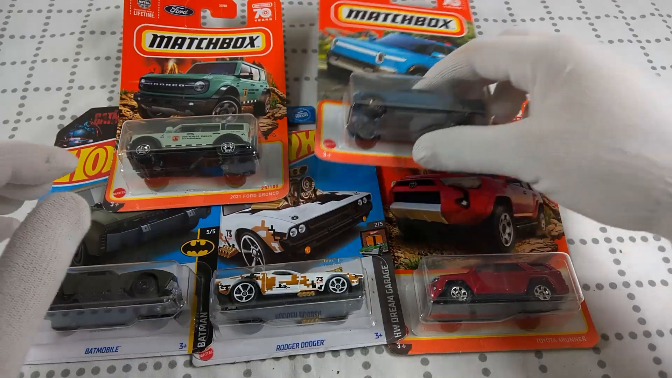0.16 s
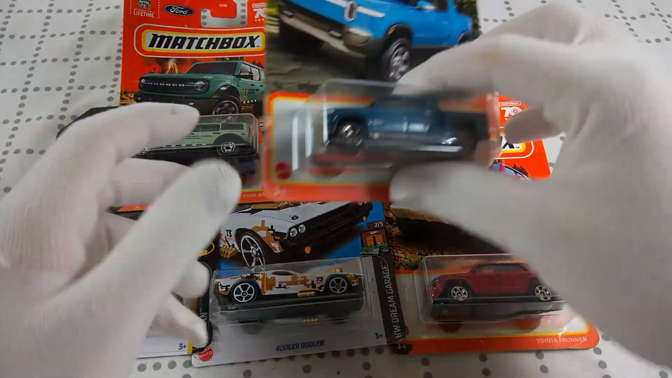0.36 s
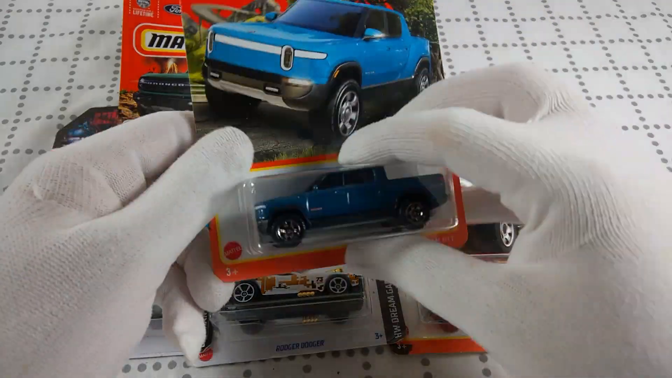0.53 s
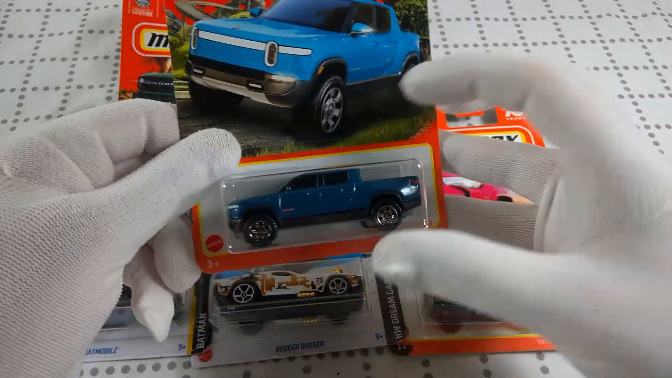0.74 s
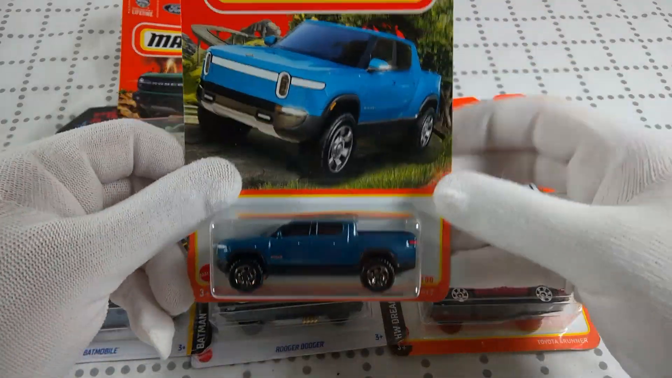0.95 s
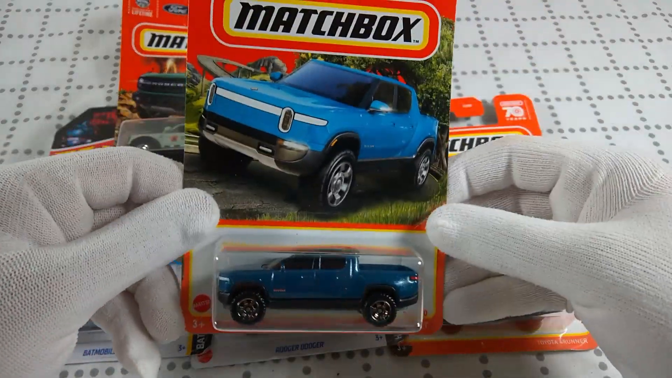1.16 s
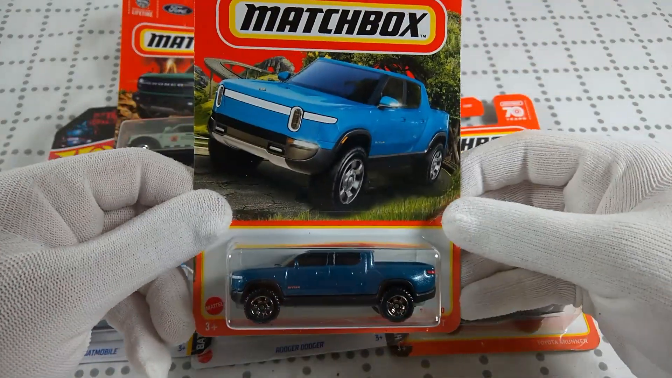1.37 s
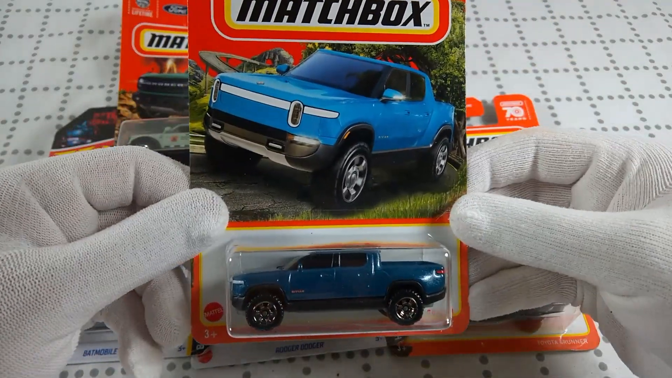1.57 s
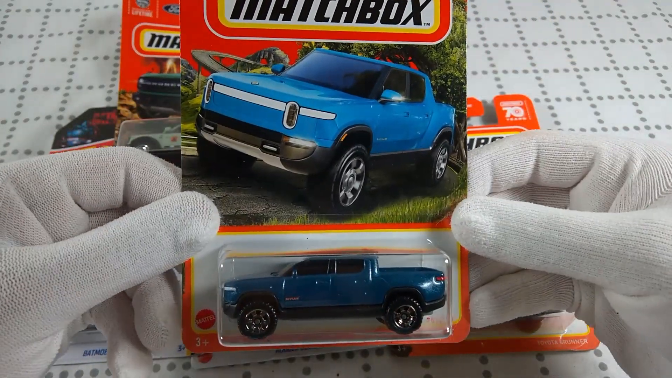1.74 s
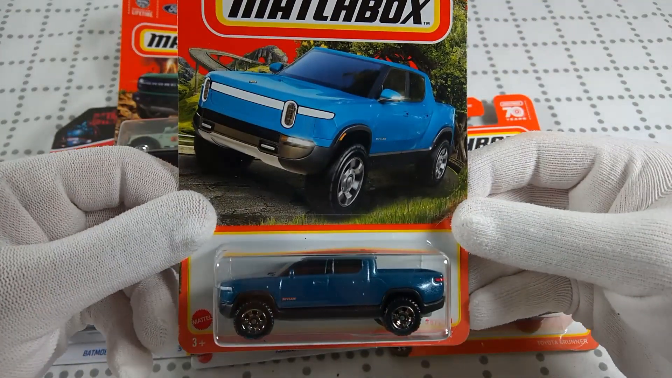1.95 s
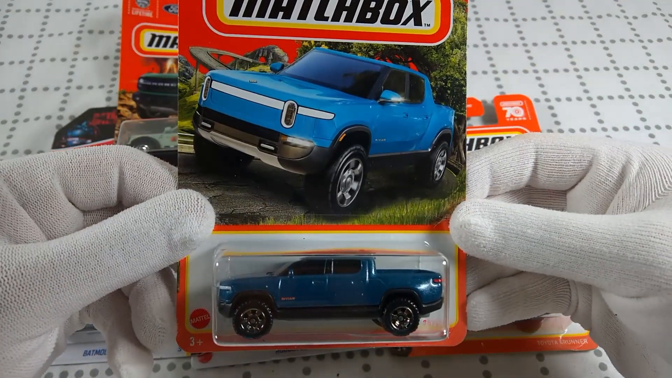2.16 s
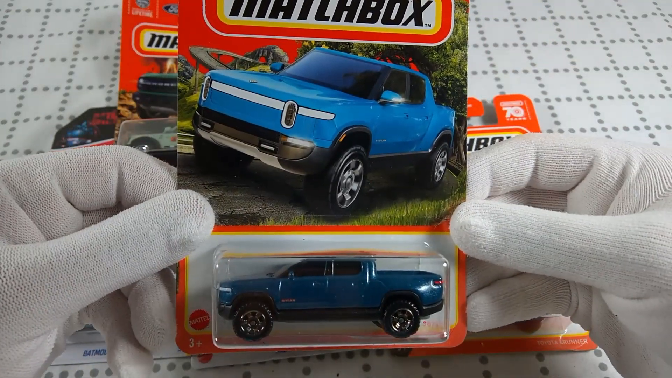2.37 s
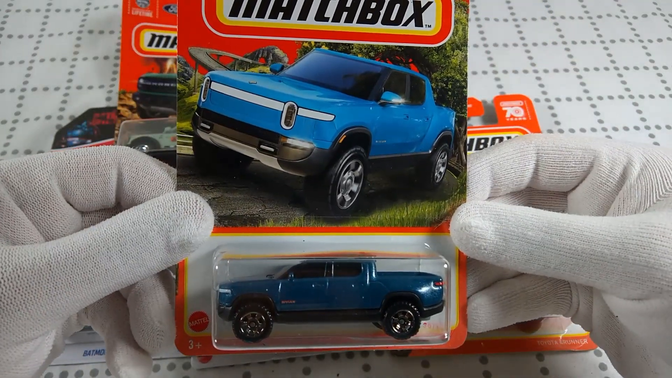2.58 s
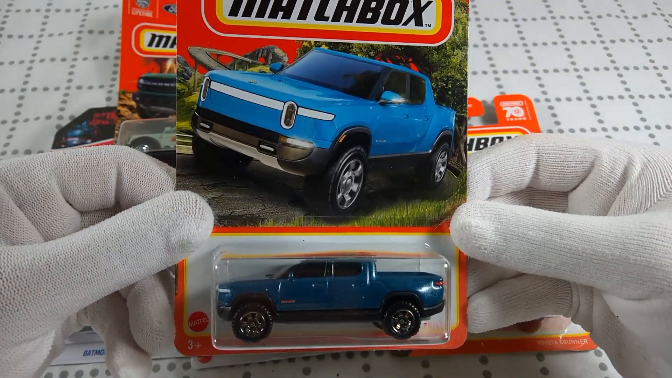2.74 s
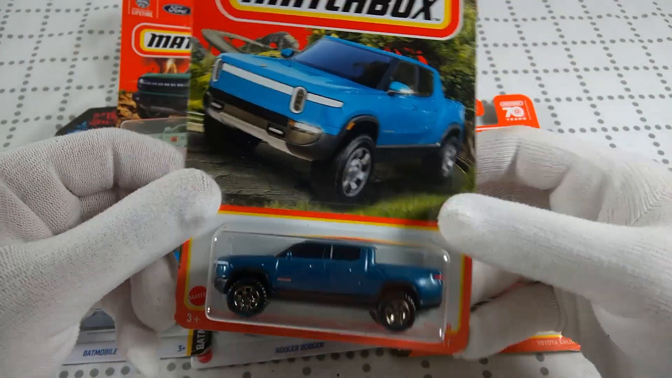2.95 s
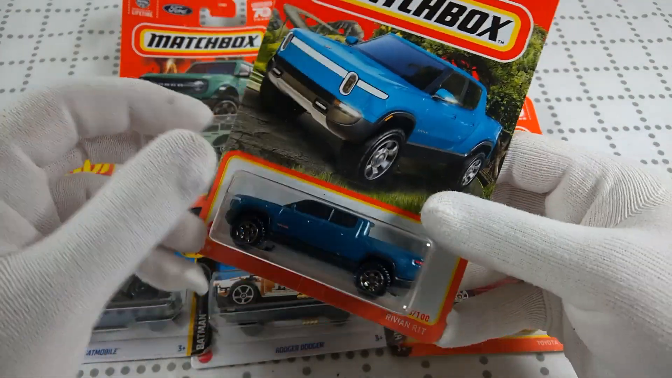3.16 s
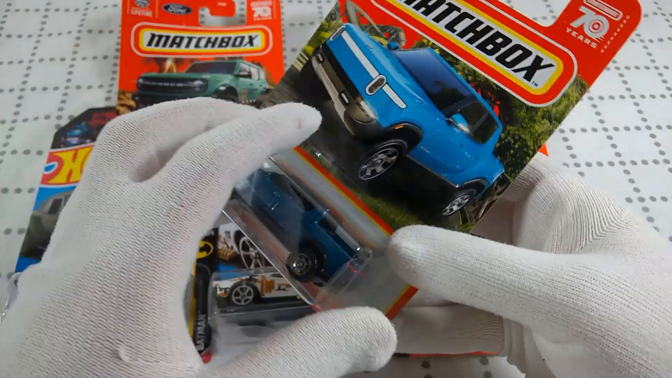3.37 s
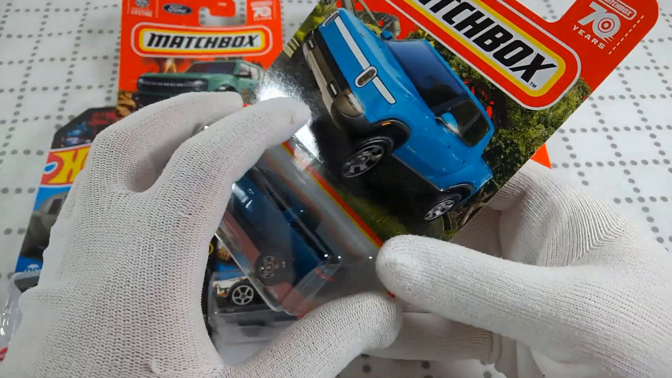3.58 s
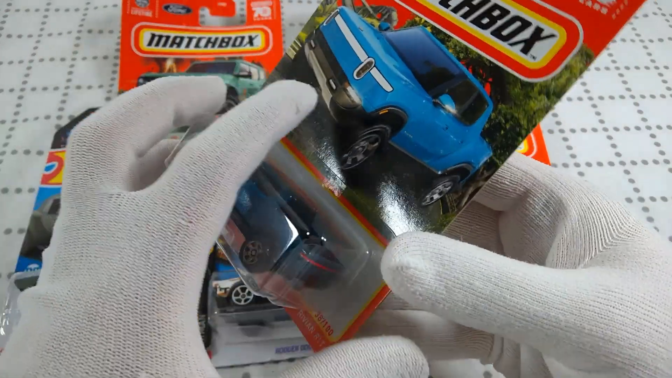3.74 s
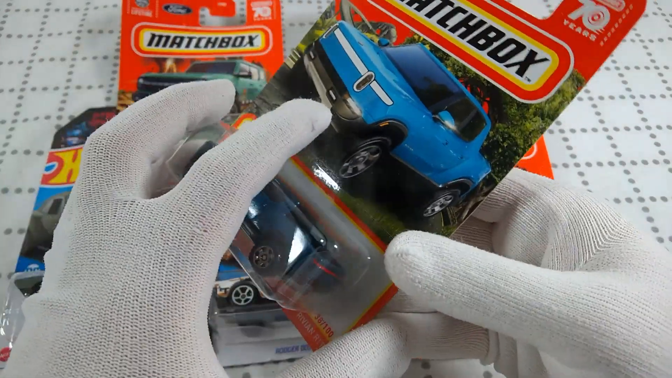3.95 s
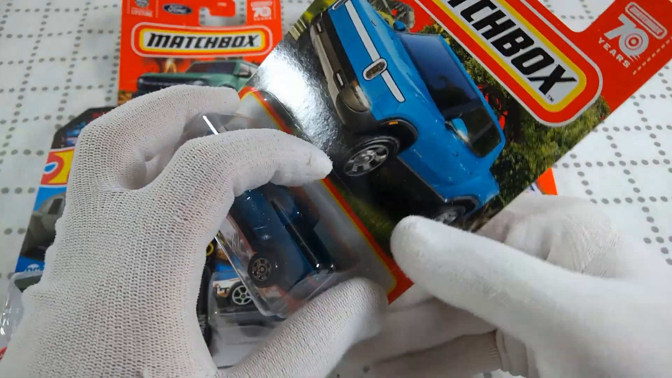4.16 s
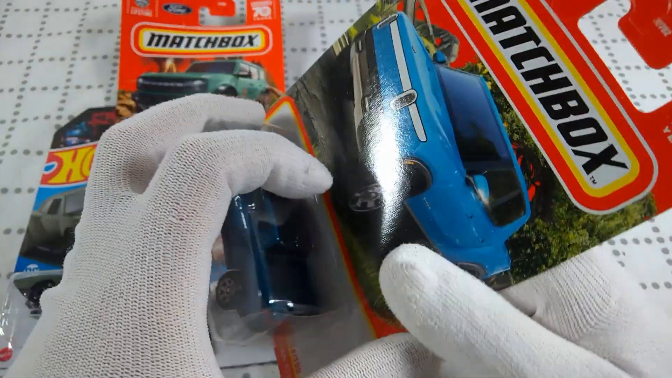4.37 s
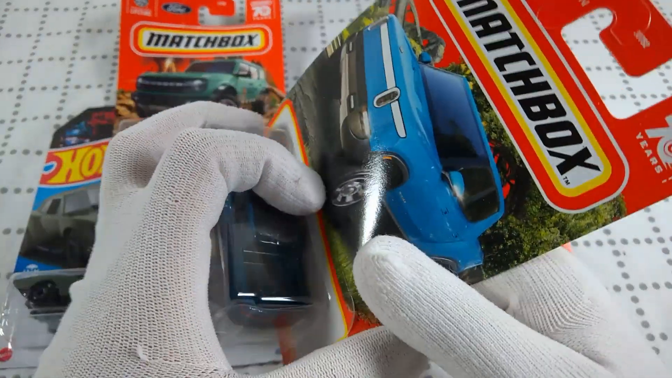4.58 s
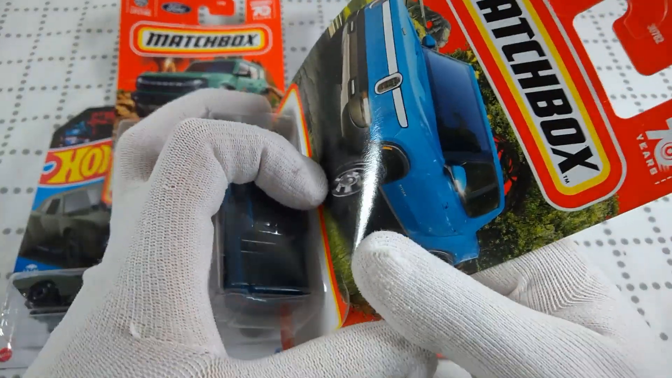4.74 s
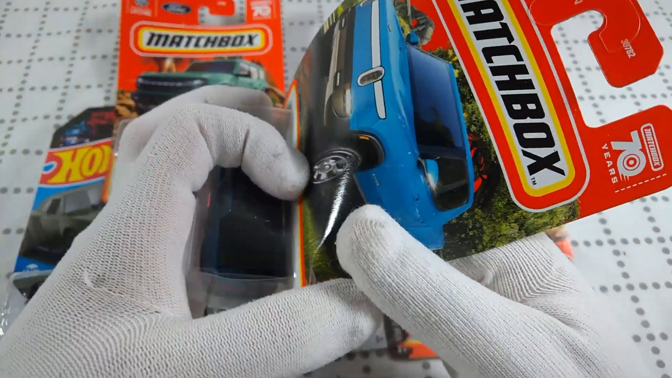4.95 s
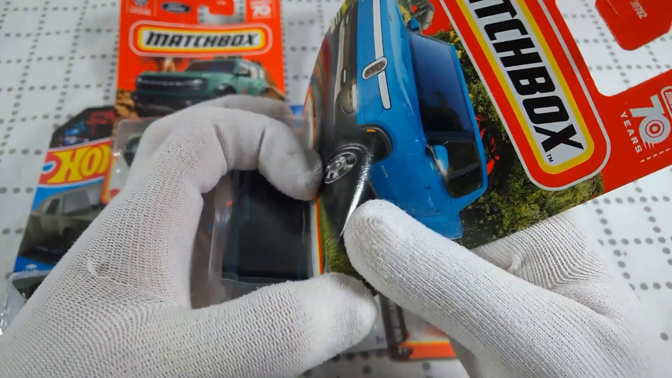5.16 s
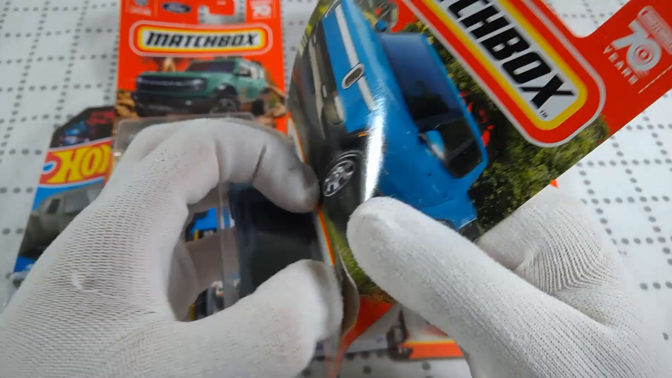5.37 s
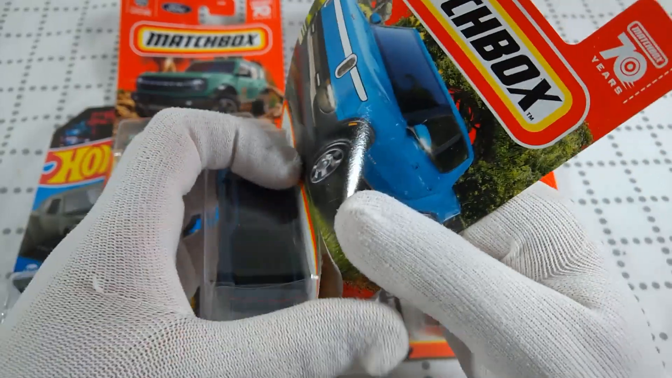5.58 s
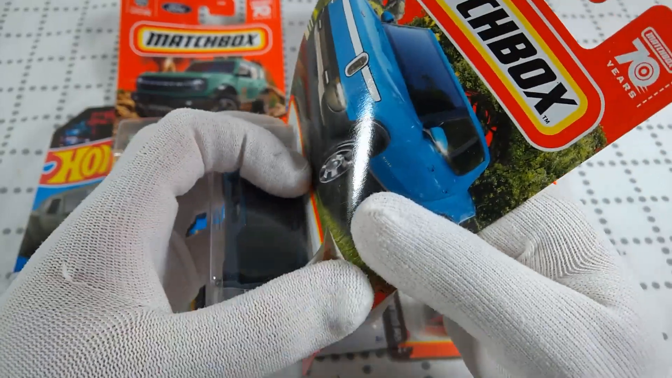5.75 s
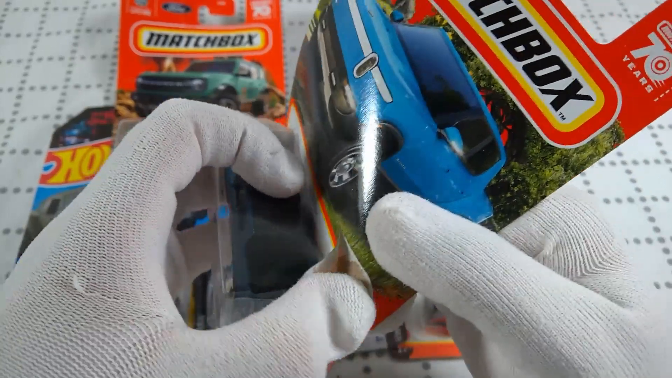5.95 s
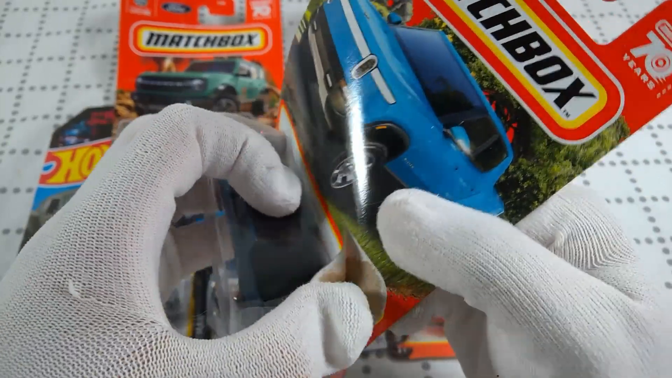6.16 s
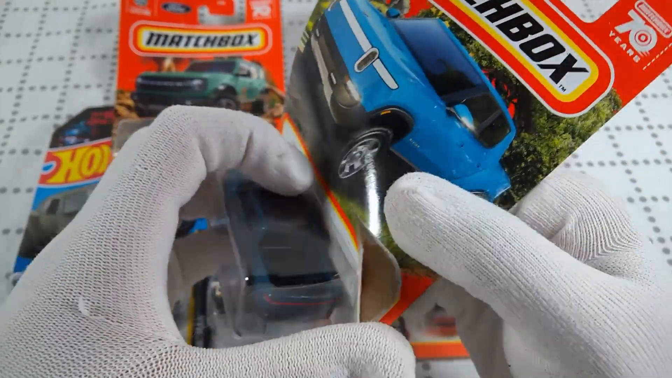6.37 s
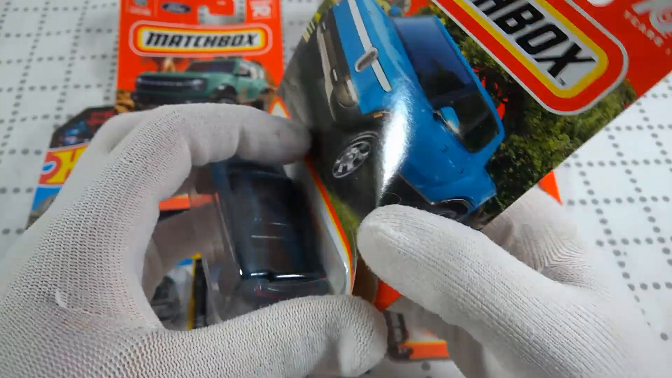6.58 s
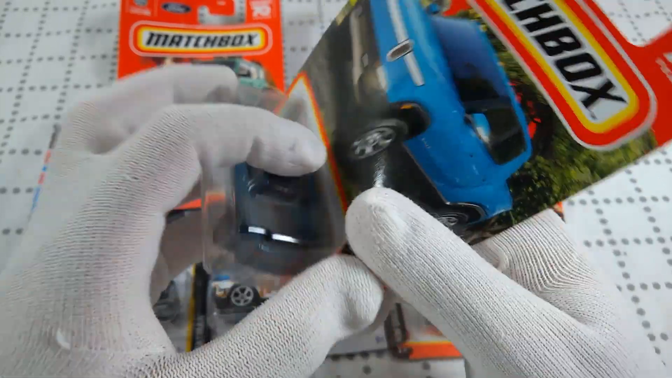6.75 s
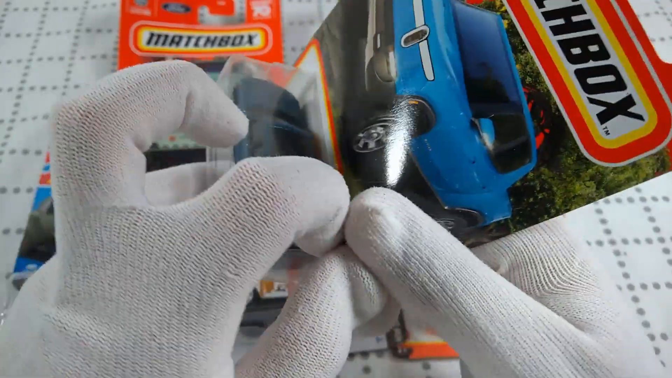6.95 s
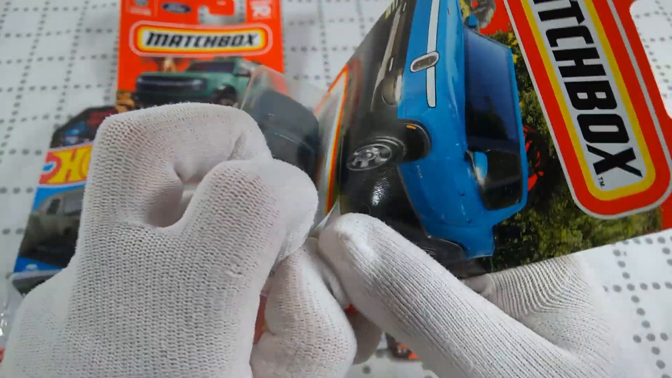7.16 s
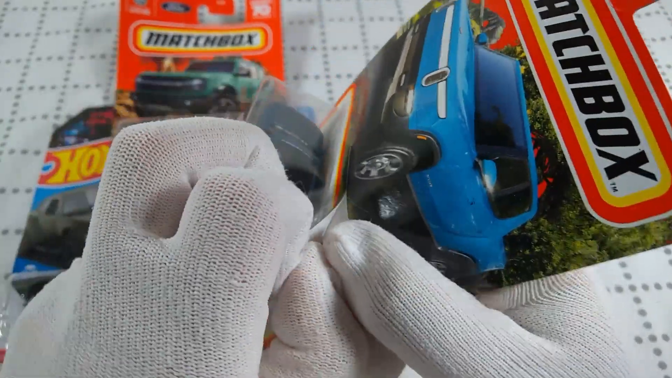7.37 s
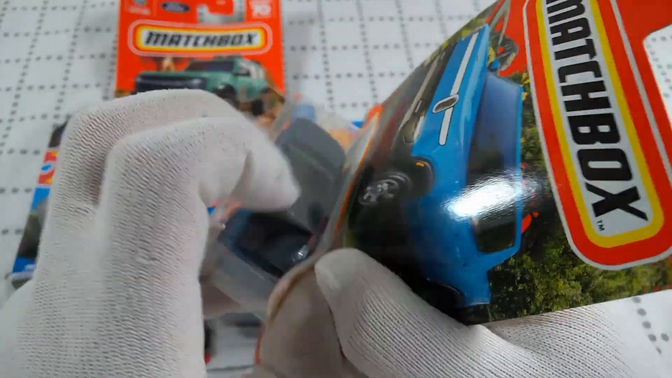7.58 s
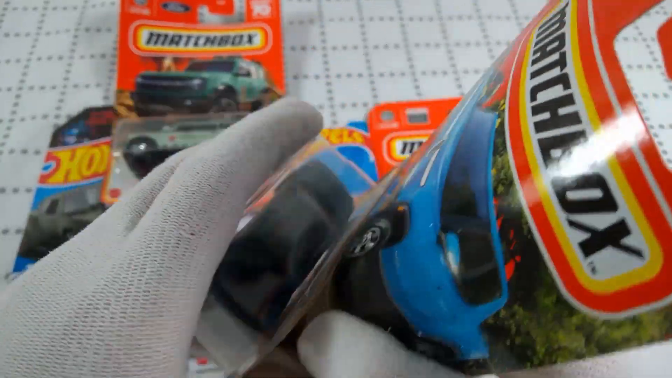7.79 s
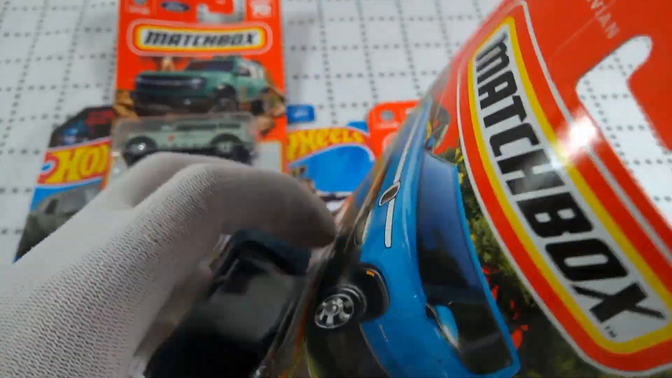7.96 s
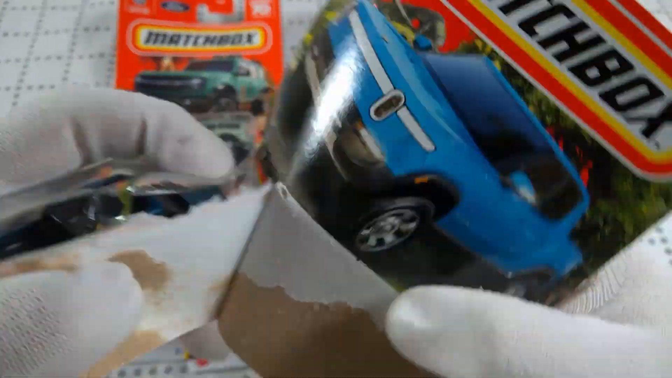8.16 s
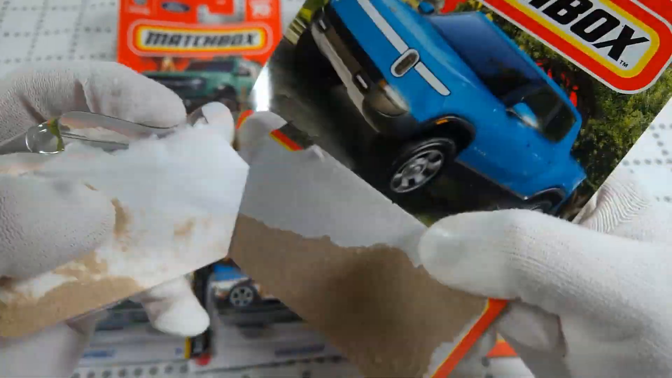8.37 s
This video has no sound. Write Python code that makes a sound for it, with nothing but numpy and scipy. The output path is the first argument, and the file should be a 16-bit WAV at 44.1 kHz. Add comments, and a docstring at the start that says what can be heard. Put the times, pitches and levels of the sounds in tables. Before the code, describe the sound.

Knitted gloves slide softly over a toy's card and plastic shell, which gives scattered small ticks. Past the middle the shell pops sharply, then snaps and crinkles more and more until the cardboard rips coarsely near the end, with a few dull bumps. Everything is close and dry, leaning to the right of a stereo microphone, with a low, quiet room hum underneath.

```python
"""A carded blister pack snaps, rustles and tears open in gloved hands, close to a stereo microphone.
The plastic shell buckles: each release cracks and rings its modes. Knitted fingers catch and slip on the
glossy card as hiss and a faint squeak; under load the card fibres rip in coarser grains.
The right capsule faces the pack, the left lies in its shadow. The stand thumps; a quiet room hums below."""
import sys
import numpy as np
from scipy import signal
from scipy.fft import rfft, irfft, next_fast_len
from scipy.io import wavfile
from scipy.ndimage import uniform_filter1d

SR = 44100
rng = np.random.default_rng(int(sys.argv[2]) if len(sys.argv) > 2 else 0)


def to_wav(sig):
    """Store sig (one row per channel, or 1-D mono) as 16-bit WAV at the path in sys.argv[1].

    Samples outside -1..1 are clipped; the rate is SR.
    """
    pcm = np.clip(np.atleast_2d(sig), -1, 1) * 32767
    pcm = np.round(pcm).astype(np.int16)
    wavfile.write(sys.argv[1], SR, pcm.T)  # frames by channels


N = 371322

# The shell buckles or knocks. Each row: start in seconds, peaks of low modes, middle modes, high modes
# and crack in dB, favoured pitch in Hz, left minus right in dB before the shadow.
SHELL_SNAPS = [(0.0508, -71, -51, -41.5, -54, 4200, -5), (0.1009, -51, -49, -64, -79, 800, -11),
               (0.1204, -52, -54, -64, -59, 920, -13), (0.1413, -43, -52, -65, -79, 880, -15),
               (0.1708, -42, -50, -52, -52, 1200, -19), (0.987, -41.5, -53, -55, -58, 1110, -8),
               (1.1389, -68, -44.5, -35.5, -38, 2000, -21), (1.1893, -70, -55, -49, -39, 1490, -8),
               (1.2046, -66, -47, -36.5, -39, 5540, -12), (1.5176, -70, -70, -51, -43, 3900, -15),
               (3.0733, -72, -36, -37, -44, 2010, -8), (3.0987, -63, -40, -58, -49, 2370, -11),
               (3.1962, -33.5, -41.5, -35, -36, 1020, -9), (4.0403, -32, -36, -26.5, -37, 1040, -13),
               (4.0646, -23.5, -37, -24, -36, 755, -11), (4.954, -42, -56, -64, -70, 805, -8),
               (4.977, -44.5, -58, -66, -70, 800, -8), (5.0283, -47, -49, -57, -47, 820, -2),
               (5.2991, -23, -18, -14, 2.5, 5070, -14), (5.3311, -0.5, -9.5, -10, -15.5, 913, -6),
               (5.337, -6.5, -19.5, -36, -40, 611, -4.5), (5.3468, -28, -33, -32, -49.5, 800, -16),
               (5.9059, -24, -23, -51, -42, 1810, -3.5), (6.543, -39, -54.5, -55, -63, 1100, -7),
               (6.8487, -58, -41, -58, -61, 1720, -7), (6.8657, -26.5, -38, -51, -58, 730, -3),
               (7.1402, -61, -54, -25, -21, 4600, -13), (7.1605, -65.5, -50, -28.5, -19, 4950, -5),
               (7.179, -64, -55, -39, -30, 4900, -5), (7.199, -63, -55, -31, -22, 4900, -5),
               (7.214, -62, -58, -38, -31, 4900, -5), (7.2238, -9, -7.5, -2.5, -15, 2670, -8),
               (7.3394, -55.5, -7, -50, -35, 1770, -4.5), (7.4147, -62, -55, -30.5, -29, 3720, -14),
               (7.4488, -35, -35.5, -42, -43, 1720, -6), (7.4743, -66, -55, -31, -23, 3570, -14),
               (7.4788, -68, -45, -24, -20, 2630, -18), (7.4952, -37.5, -37, -53, -51, 1060, -3),
               (7.53, -45, -44, -44, -37, 1670, -1), (7.5766, -50, -8.5, -15, -31, 1620, -2),
               (7.7099, -26, -33, -26, -28, 606, -5), (7.7272, -25, -33, -20, -11.5, 2030, -3),
               (7.9385, -59, -43, -25, -26, 2080, -5), (7.9525, -57, -53, -16, -19, 2070, -3),
               (7.9906, -40, -44, -20, -15.5, 1720, -22), (7.9975, -18, -9.5, -16, -28, 1923, -0.5),
               (8.0015, -8, -20, -34, -40, 1000, -20), (8.0618, -23, -29, -16, -15, 1040, 2),
               (8.0848, -41, -21.5, -10.5, -16, 1920, 1.5), (8.0973, -16, -18, -2, -7, 680, -22),
               (8.1036, -24, -26, -11, -15, 1420, 4), (8.1229, -42, -10.5, -7, -6, 1540, -1),
               (8.1282, -39, -17, -7.5, -17, 1530, 2), (8.1353, -34, -10.5, -24, -20, 2550, -4),
               (8.1537, -30, -10, -19, -5, 1480, 2), (8.2124, -42, -19, -40, -12.5, 2740, -9),
               (8.257, -45, -31, -48, -21, 2300, -14), (8.3299, -41, -46, -23.5, -20, 1370, -1),
               (8.4032, -44, -22, -14.5, -14, 1500, -5.5)]
# Shell and card resonances. Each row: pitch in Hz, relative level in dB, T60 in seconds.
SHELL_MODES = [(598, 17.5, 0.013), (825, 4.5, 0.012), (1020, 9.5, 0.011), (1088, -12.5, 0.0063),
               (1290, -31.5, 0.015), (1482, 10.5, 0.019), (1784, 17, 0.015), (1912, 5.5, 0.014),
               (2390, -0.5, 0.0041), (2637, 1, 0.015), (3269, 6.5, 0.003), (3560, 0, 0.0049),
               (4204, 0.5, 0.0056), (5130, 9.5, 0.0026), (5650, -6.5, 0.0058)]
# A finger slides or the card rips. Each row: peak time, rise and fall in seconds,
# relative levels of card, hollow shell, fibre hiss and air hiss in dB.
FINGER_STROKES = [(0.0, 0.064, 0.28, -61.5, -66, -67.5, -75), (.445, 0.21, 0.033, -68, -72, -68, -72),
                  (.595, 0.042, 0.099, -67, -70, -64.5, -72), (.655, .03, 0.054, -68, -57, -53.5, -62),
                  (0.688, 0.021, 0.024, -49.5, -43.5, -50.5, -55), (.78, 0.3, 0.19, -70, -67, -67, -65.5),
                  (.91, 0.15, 0.1, -61, -64, -58, -60), (1.11, 0.079, 0.096, -100, -74, -60.5, -65),
                  (2.97, 0.029, .1, -86, -104, -65.5, -68), (3.016, 0.12, 0.081, -58, -56, -53.5, -57.5),
                  (3.09, 0.059, 0.035, -50, -54.5, -56, -69), (3.155, 0.014, 0.06, -51, -56, -56.5, -65),
                  (3.188, 0.057, 0.008, -53, -51, -63, -66), (3.39, 0.26, 0.3, -71.5, -72, -65.5, -69.5),
                  (3.5, .1, 0.091, -66.5, -67.5, -74, -78), (3.647, 0.066, 0.057, -69.5, -75, -64, -72),
                  (3.737, 0.071, 0.067, -70, -72, -61, -70), (4.052, 0.096, 0.057, -56, -57, -49, -55.5),
                  (4.184, 0.13, .11, -62.5, -55, -47, -53), (4.33, 0.15, 0.066, -72, -67, -60, -68),
                  (4.499, 0.082, 0.066, -53, -54, -47.5, -56), (4.636, 0.054, 0.06, -52, -47, -49, -53.5),
                  (4.8, 0.32, 0.017, -67, -59.5, -59, -66.5),
                  (4.927, 0.053, 0.05, -59.5, -49.5, -51, -57.5),
                  (5.08, 0.041, 0.079, -59, -47, -47.5, -59), (5.207, 0.069, 0.15, -55, -43.5, -51, -62),
                  (5.304, .04, 0.046, -40.5, -42, -34, -39), (5.375, .025, 0.081, -41.5, -65, -52, -68),
                  (5.44, 0.14, 0.13, -56.5, -58.5, -55, -62), (5.511, .1, .025, -55.5, -66.5, -59, -61),
                  (5.598, 0.033, .06, -85, -85, -62, -65.5), (5.692, 0.038, 0.084, -55, -57, -48, -62),
                  (5.74, 0.12, 0.028, -61, -63, -46.5, -51.5), (5.854, 0.039, .08, -61, -59.5, -45.5, -51),
                  (5.95, 0.13, 0.1, -55.5, -62, -55, -61), (6.12, 0.12, .1, -67.5, -83, -58.5, -54),
                  (6.198, 0.071, 0.024, -55, -45, -43, -49), (6.325, 0.054, 0.053, -56.5, -49, -45, -45.5),
                  (6.415, 0.036, 0.026, -60.5, -53.5, -57, -60),
                  (6.557, 0.093, 0.28, -57.5, -55, -54, -57.5), (6.77, 0.58, 0.11, -65, -53, -49, -53),
                  (6.84, 0.14, 0.023, -53.5, -53, -51.5, -61), (6.962, 0.11, 0.073, -62.5, -64, -54.5, -60),
                  (7.09, .2, 0.2, -59, -63, -54.5, -64), (7.15, .08, 0.21, -73, -58, -49.5, -53),
                  (7.251, 0.026, 0.077, -39, -55, -41, -50.5), (7.359, 0.034, 0.077, -50, -42, -47, -66),
                  (7.495, 0.043, 0.053, -82.5, -70, -56, -51), (7.55, 0.029, 0.065, -60, -49, -53, -51),
                  (7.66, 0.11, 0.11, -45, -48.5, -40.5, -44), (7.728, 0.013, 0.15, -45, -43.5, -33.5, -44),
                  (7.85, 0.26, 0.04, -75, -68, -46.5, -48.5), (7.97, .1, .06, -74, -51, -51, -51),
                  (8.055, 0.041, 0.18, -41.5, -55, -37, -40.5), (8.1, 0.022, 0.043, -29, -31, -35, -42),
                  (8.131, 0.035, 0.084, -30.5, -24.5, -23.5, -29),
                  (8.158, .015, 0.081, -30.5, -26, -32.5, -36),
                  (8.19, 0.16, 0.067, -36, -33.5, -36.5, -36.5),
                  (8.336, 0.034, 0.15, -37.5, -36.5, -38.5, -36),
                  (8.373, 0.049, 0.053, -36, -43, -35.5, -42)]
# Gloves rest and creep. Each row: time in seconds, relative levels of card and fibre hiss in dB.
RESTING_GRIP = [(0.0, -90, -82), (.3, -69.5, -87), (1.0, -63.5, -69.5), (1.25, -71.5, -77.5),
                (1.5, -72.5, -79.5), (2.74, -83.5, -110), (2.92, -82, -92), (3.3, -77, -84),
                (3.9, -79.5, -71.5), (4.3, -79, -63), (5.0, -91, -65), (5.55, -82, -73),
                (5.8, -90.5, -67.5), (6.241, -85, -74), (7.0, -70.5, -78), (7.4, -60, -55),
                (7.9, -57.5, -62), (8.42, -79, -51)]
# Spectra of the four friction bands. Each row: frequency in Hz, relative density in dB.
CARD_SPECTRUM = [(250, -9.5), (560, -10.5), (780, -2), (980, -0.5), (1250, -4), (1700, -17)]
HOLLOW_SPECTRUM = [(1000, -18), (1300, -19.5), (1650, -1.5), (1850, -13.5), (2080, 4.5), (2400, -6.5),
                   (3000, -11)]
FIBRE_SPECTRUM = [(1900, -16), (2500, 2), (3000, -3), (3700, -2.5), (4600, -1.5), (5600, -6), (7000, -10.5),
                  (9500, -23.5)]
AIR_SPECTRUM = [(3240, -59), (5500, -5.5), (9720, 1.5), (15100, -4), (16200, -19.5), (16600, -58.5)]
# The pack moves about. Each row: time in seconds, left minus right in dB before the shadow.
PACK_PAN = [(0.0, -10), (1.0, -14), (2.25, -7), (2.79, -11), (3.49, -11), (3.75, -9), (6.99, -7),
            (8.42, -6.5)]
# Fingertip on the gloss. Each row: time in seconds, pitch in Hz, relative level in dB.
SQUEAK_GLIDE = [(0.08, 9497, -94), (0.088, 9651, -93), (0.126, 10130, -100), (0.156, 10287, -94),
                (0.23, 9750, -100)]
# Jolts of the stand. Each row: centre in seconds, level in dB, length in seconds, low-pass in Hz.
STAND_JOLTS = [(3.076, -62.5, 0.11, 120), (5.327, -50, 0.11, 350), (5.586, -63.5, 0.14, 70),
               (7.249, -52, 0.029, 153), (7.691, -47, 0.05, 400), (7.749, -61, 0.16, 71.4),
               (7.883, -60, 0.094, 67), (7.938, -65, 0.056, 60), (8.021, -46, 0.05, 410),
               (8.159, -35, 0.077, 450), (8.214, -45.5, 0.053, 164), (8.351, -53, 0.096, 308)]
# Far rumble. Each row: time in seconds, level in dB.
RUMBLE_LEVELS = [(0.0, -67.5), (1.05, -65), (1.71, -70.5), (5.14, -71.5), (5.49, -66), (6.1, -71),
                 (7.53, -68), (8.33, -62), (8.42, -55)]
# Background spectra. Each row: frequency in Hz, relative density in dB.
RUMBLE_SPECTRUM = [(12, -21.5), (20, -11.5), (49, -5), (86, -15), (118, -5.5), (145, -19.5), (160, -5.5),
                   (210, -7), (350, -120)]
ROOM_SPECTRUM = [(130, -75.5), (220, -7.5), (290, -4.5), (370, -9), (770, -14.5), (950, -19), (1210, -21),
                 (1600, -23), (4000, -27), (8000, -33), (16600, -43)]

SPLUTTER_DB, SPLUTTER_DECAY_S, CRACK_DECAY_S = -18.5, 0.0029, 0.00058
CRACK_ABOVE_HZ, SHELL_ABOVE_HZ = 6500, 701
FAVOUR_DB, FAVOUR_OCTAVES = 19.5, 0.13
TILT_FROM_HZ, TILT_DB_PER_OCTAVE = 1960, 42.5
RIP_FROM_DB, RIP_COARSENING = -46, 0.09
STROKE_DROP_DB, STROKE_ROUNDNESS = 20, 1.31
HUM_HZ, HUM_T60_S, HUM_DB = 183.5, 0.12, -73
SHADOW_HZ, DEEP_SHADOW_HZ, SCATTER_DB, SCATTER_T60_S = 2600, 8000, -8, 0.005
ROOM_DB, ROOM_T60_S, WALL_HZ = -11, 0.12, 2900
CUTOFF_HZ = 16350


def snaps():
    """The shell buckles: a sharp release and a splutter ring its modes, with a short treble crack."""
    size = SR // 10
    t, out = np.arange(size) / SR, np.zeros((2, N + size))
    treble = signal.butter(2, CRACK_ABOVE_HZ, "high", fs=SR, output="sos")
    thin = signal.butter(6, SHELL_ABOVE_HZ, "high", fs=SR, output="sos")   # small shell: no bass
    group_edges_hz = [1250, 2200, 3300]
    for start_s, low_db, middle_db, high_db, crack_db, favoured_hz, pan_db in SHELL_SNAPS:
        tilt_db = TILT_DB_PER_OCTAVE * np.clip(np.log2(favoured_hz / TILT_FROM_HZ), 0, 0.5)
        peaks_db = [low_db, middle_db - tilt_db, middle_db, high_db, crack_db]
        noise = rng.standard_normal((2, size))
        force = amp(SPLUTTER_DB) * noise[0] * np.exp(-t / SPLUTTER_DECAY_S)
        force[0] += rng.choice([-1, 1])
        parts = np.zeros((5, size))   # four mode groups, then the crack
        for hz, level_db, t60_s in SHELL_MODES:
            # The spot that buckles favours one pitch.
            nearness = np.exp(-(np.log2(hz / favoured_hz) / FAVOUR_OCTAVES) ** 2)
            strength = amp(level_db + FAVOUR_DB * nearness + rng.normal(0, 2.1))
            mode = ring(force, hz * rng.normal(1, 0.048), t60_s)
            parts[np.searchsorted(group_edges_hz, hz)] += strength * mode
        parts = signal.sosfilt(thin, parts)
        parts[4] = signal.sosfilt(treble, noise[1] * np.exp(-t / CRACK_DECAY_S))
        parts *= (amp(peaks_db) / np.abs(parts).max(axis=1))[:, None]
        at = round(start_s * SR)
        out[:, at:at + size] += parts.sum(axis=0) * amp([[pan_db], [0]])
    return out[:, :N]


def rub():
    """The same slips shake card, shell and fibres; the grip favours changing modes."""
    levels_db = handling_db()
    ripping_db = RIP_COARSENING * np.maximum(levels_db[2] - RIP_FROM_DB, 0)   # whole fibres break
    right, other = (friction(2.0 + ripping_db, flicker_db=1.31) for _ in range(2))
    grip, out = 0, 0
    for hz, _, t60_s in SHELL_MODES[1:8]:
        grip += amp(6 * np.tanh(drift(rate_hz=4))) * unit(ring(right, hz, t60_s))
    spectra = (CARD_SPECTRUM, HOLLOW_SPECTRUM, FIBRE_SPECTRUM, AIR_SPECTRUM)
    correlations = (0.84, 0.91, 0.94, 0.1)
    for level_db, spectrum, correlation in zip(levels_db, spectra, correlations):
        left = correlation * right + np.sqrt(1 - correlation ** 2) * other
        slips = np.array([left, right]) + amp(-17.5) * grip
        out += amp(level_db + 0.21 * drift(rate_hz=57)) * coloured(slips, spectrum)
    return out


def friction(spread_db, flicker_db):
    """Threads catch and slip: dense uneven grains, levelled over 50 ms, with a fast flicker."""
    grains = rng.standard_normal(N) * amp(spread_db * np.minimum(rng.exponential(1, N), 6))
    grains /= np.sqrt(uniform_filter1d(grains ** 2, size=SR // 20))
    return grains * amp(flicker_db * drift(rate_hz=110))


def handling_db():
    """Card, hollow, fibre and air levels: resting grip, strokes and settling after snaps add in power."""
    t = np.arange(0, N + 32, 32) / SR
    times_s, card_db, fibre_db = np.transpose(RESTING_GRIP)
    resting_db = (card_db, fibre_db - 2.5, fibre_db, fibre_db - 6)
    power = amp([np.interp(t, times_s, band) for band in resting_db]) ** 2
    for peak_s, rise_s, fall_s, *peaks_db in FINGER_STROKES:
        away = np.where(t < peak_s, (peak_s - t) / rise_s, (t - peak_s) / fall_s)
        power += amp(np.array(peaks_db)[:, None] - STROKE_DROP_DB * away ** STROKE_ROUNDNESS) ** 2
    under_snap_db, settle_db_per_s = [27, 24, 27, 37.5], [700, 330, 332, 300]
    for start_s, *peaks_db, _, _ in SHELL_SNAPS:
        start_db = np.array(peaks_db) - under_snap_db
        drop_db = np.outer(settle_db_per_s, np.abs(t - start_s))
        power += (t > start_s) * amp(start_db[:, None] - drop_db) ** 2
    return [np.interp(np.arange(N) / SR, t, 10 * np.log10(band)) for band in power]


def squeak():
    """A fingertip on the gloss: a thin gliding whistle with 13 ms fades."""
    hz, level_db = in_time(SQUEAK_GLIDE)
    t = np.arange(N) / SR
    inside_s = np.minimum(t - SQUEAK_GLIDE[0][0], SQUEAK_GLIDE[-1][0] - t)
    envelope = np.clip(inside_s / 0.013, 0, 1) * amp(level_db + 19 + 2.7 * drift(rate_hz=40))
    return envelope * np.sin(2 * np.pi * np.cumsum(hz) / SR)


def thumps():
    """A hand or the table jolts the stand: swells of low noise, partly shared by the capsules."""
    out = np.zeros((2, N + SR))
    for centre_s, level_db, length_s, top_hz in STAND_JOLTS:
        size = round(length_s * SR)
        noise = rng.standard_normal((3, SR // 2))
        band = signal.butter(2, [40, top_hz], "band", fs=SR, output="sos")
        low = signal.sosfilt(band, noise[0] + 0.66 * noise[1:])
        at = round(centre_s * SR) - size // 2
        out[:, at:at + size] += amp(level_db) * unit(low[:, -size:] * np.hanning(size))
    return out[:, :N]


def background():
    """Room tone, separate in each capsule; far rumble and a wavering hum, partly shared."""
    own, shared = rng.standard_normal((2, 2, N)), rng.standard_normal((2, N))
    tone = amp([[-69], [-67]]) * coloured(own[0], ROOM_SPECTRUM)
    rumble = coloured(0.83 * own[1] + 0.58 * shared[0], RUMBLE_SPECTRUM)
    hum = 0.37 * own[1] + shared[1]
    for _ in range(2):
        hum = ring(hum, HUM_HZ, HUM_T60_S)
    return tone + amp(in_time(RUMBLE_LEVELS)[0]) * rumble + amp(HUM_DB) * unit(hum)


def amp(db):
    """Decibels to gain."""
    return 10 ** (np.asarray(db) / 20)


def unit(x):
    """Scale to rms 1."""
    return x / np.sqrt(np.mean(x ** 2) + 1e-20)


def in_time(table):
    """Columns of timed rows, one value a sample."""
    times_s, *columns = np.transpose(table)
    return [np.interp(np.arange(N) / SR, times_s, column) for column in columns]


def coloured(x, spectrum):
    """Shape a white signal by (Hz, dB) points; rms 1."""
    hz, db = np.transpose(spectrum)
    size = next_fast_len(N)
    log_hz = np.log(np.maximum(np.arange(size // 2 + 1) * SR / size, 1))
    gain = amp(np.interp(log_hz, np.log(hz), db, left=-80, right=-80))
    return unit(irfft(rfft(x, size) * gain, size)[..., :N])


def drift(rate_hz):
    """Smooth random wander; rms 1."""
    r = np.exp(-2 * np.pi * rate_hz / SR)
    return unit(signal.lfilter([1], [1, -2 * r, r * r], rng.standard_normal(N + SR))[SR:])


def ring(x, hz, t60_s):
    """Resonator: a unit click starts a decaying sine of height 1."""
    r, w = amp(-60 / (t60_s * SR)), 2 * np.pi * hz / SR
    return signal.lfilter([0, np.sin(w)], [1, -2 * r * np.cos(w), r * r], x + 1e-18)


def dull(x, hz):
    """One-pole low-pass."""
    return signal.lfilter(*signal.butter(1, hz, fs=SR), x)


def echoes(x, t60_s, channels):
    """Many small echoes: convolution with decaying noise of energy 1."""
    t = np.arange(SR // 3) / SR
    tail = rng.standard_normal((channels, len(t))) * amp(-60 * t / t60_s)
    tail /= np.sqrt(np.sum(tail ** 2, axis=1, keepdims=True))
    return signal.fftconvolve(x[None], tail)[:, :N]


def scene():
    """The pack reaches the right capsule directly, the left scattered and dulled, both via the walls."""
    pan = [amp(in_time(PACK_PAN)[0]), np.ones(N)]
    left, right = snaps() + amp(3.5) * (rub() + squeak()) * pan
    left += amp(SCATTER_DB) * echoes(left, SCATTER_T60_S, channels=1)[0]
    left = dull(dull(left, SHADOW_HZ), DEEP_SHADOW_HZ)
    walls = echoes(dull(right, WALL_HZ), ROOM_T60_S, channels=2)
    return np.array([left, right]) + amp(ROOM_DB) * walls + thumps() + background()


def record(dry):
    """Soft limit on the loudest peaks, then a steep low-pass."""
    knee, headroom = 0.55, 0.28
    over = np.maximum(np.abs(dry) - knee, 0)
    rounded = dry - np.sign(dry) * (over - headroom * np.tanh(over / headroom))
    return signal.sosfilt(signal.cheby2(20, 90, CUTOFF_HZ, fs=SR, output="sos"), rounded)


dry = scene()
out = record(dry)
to_wav(out)
```